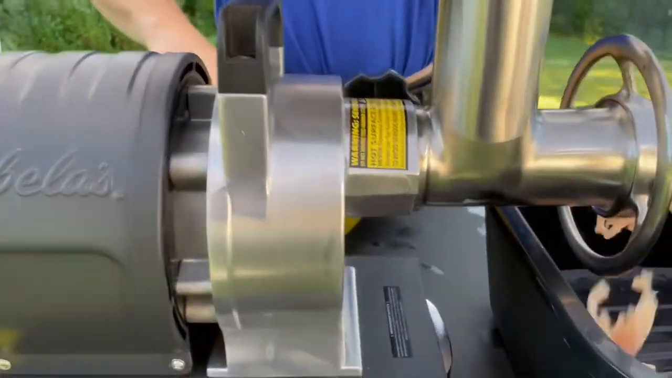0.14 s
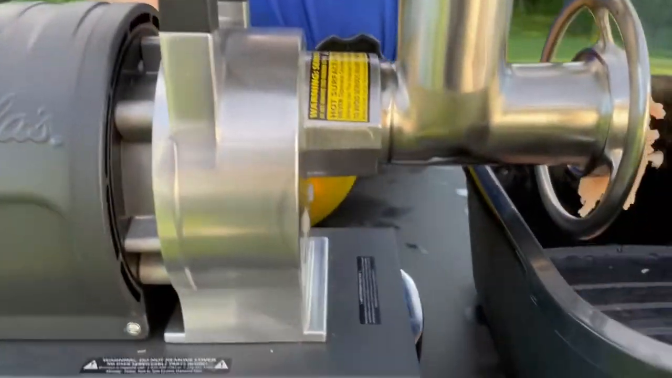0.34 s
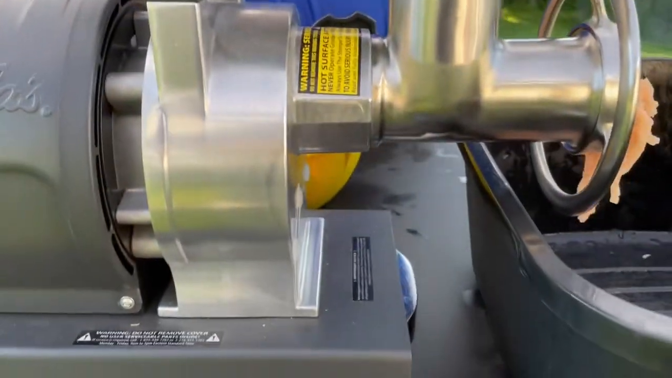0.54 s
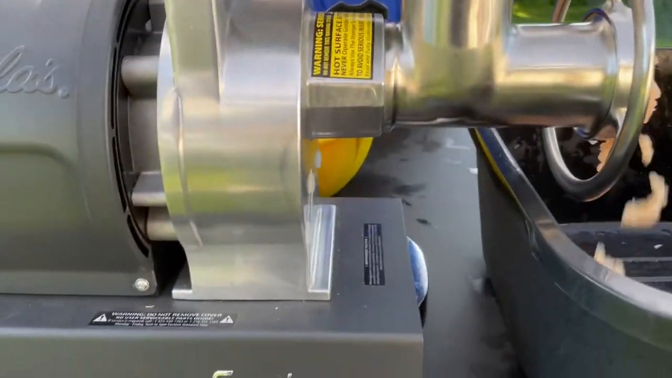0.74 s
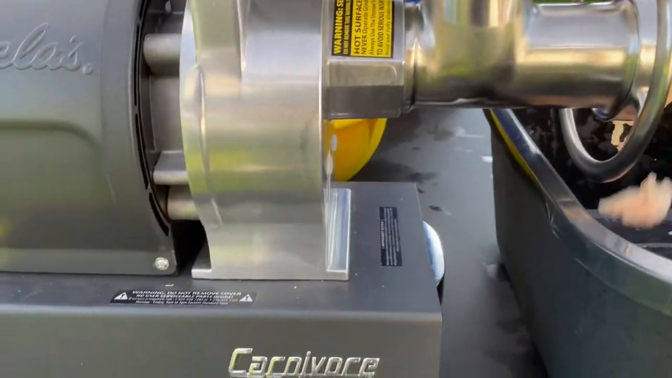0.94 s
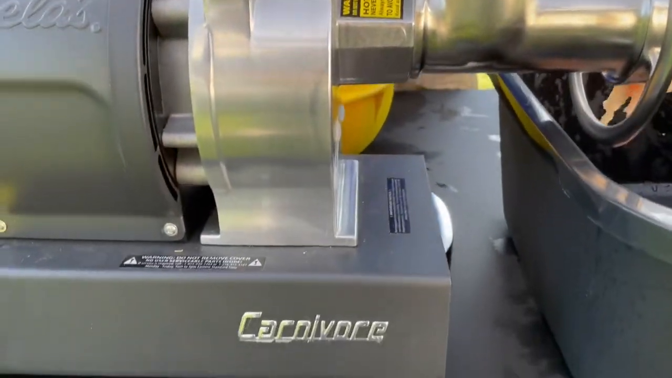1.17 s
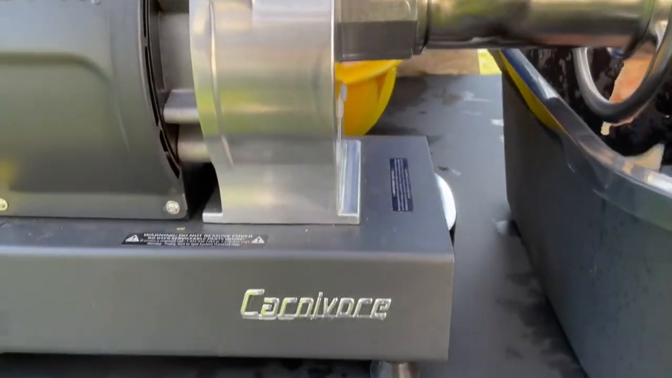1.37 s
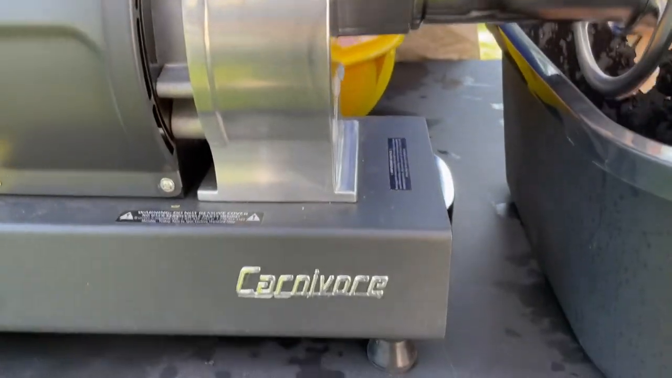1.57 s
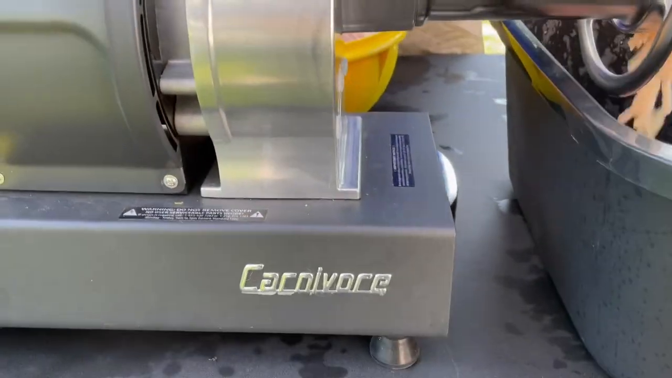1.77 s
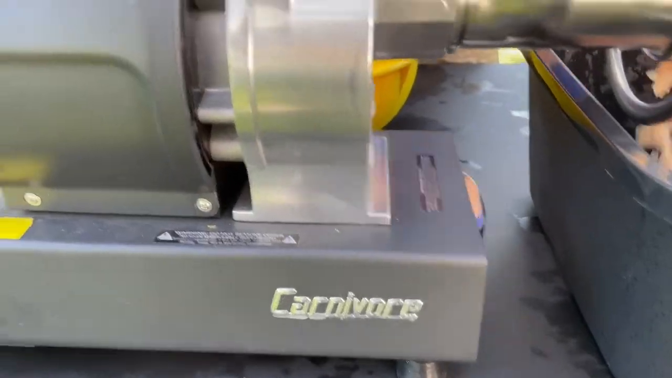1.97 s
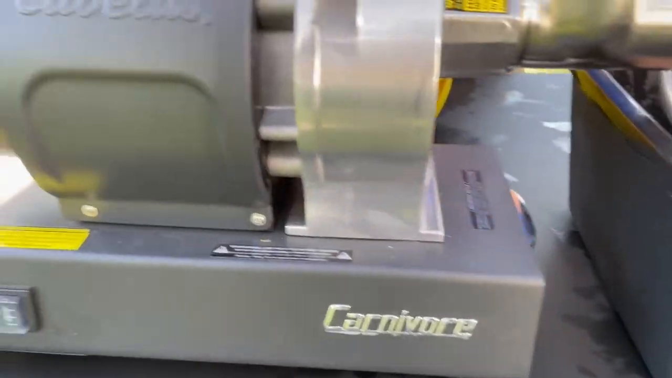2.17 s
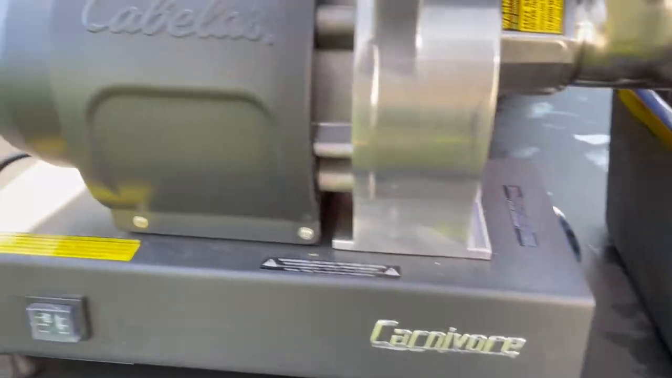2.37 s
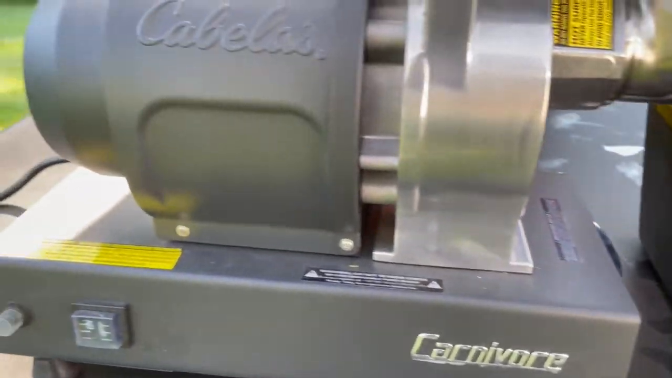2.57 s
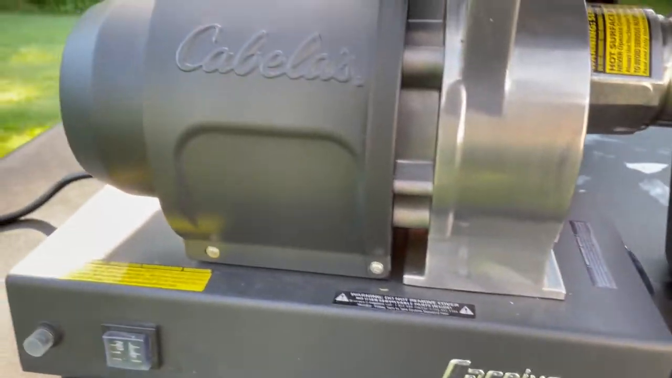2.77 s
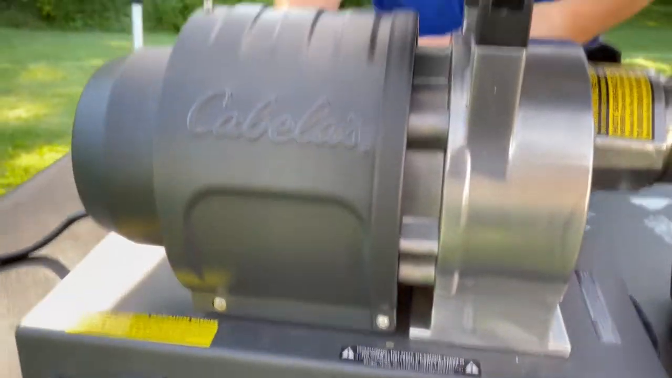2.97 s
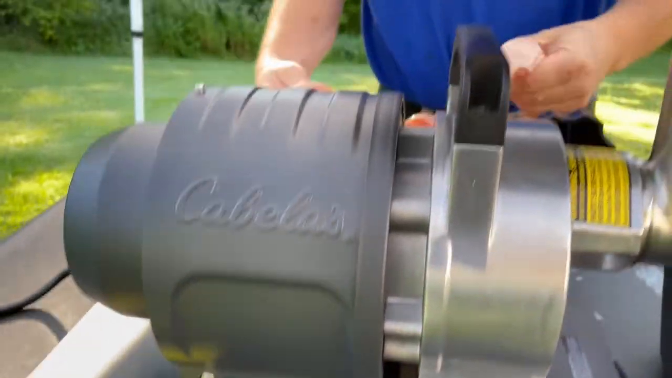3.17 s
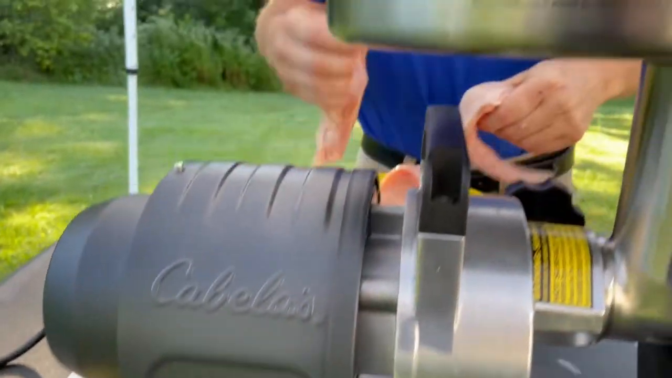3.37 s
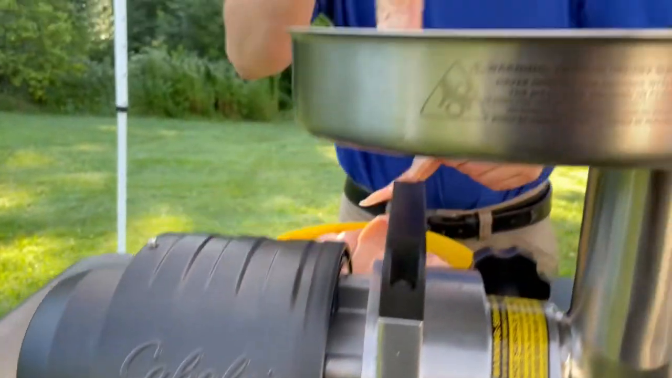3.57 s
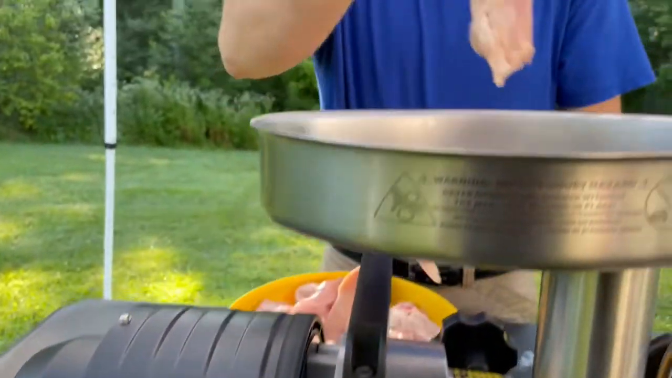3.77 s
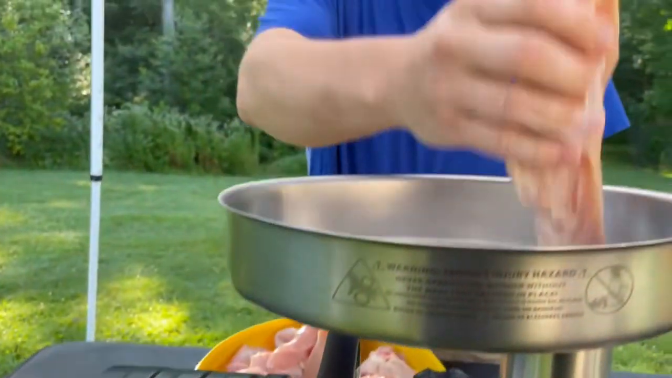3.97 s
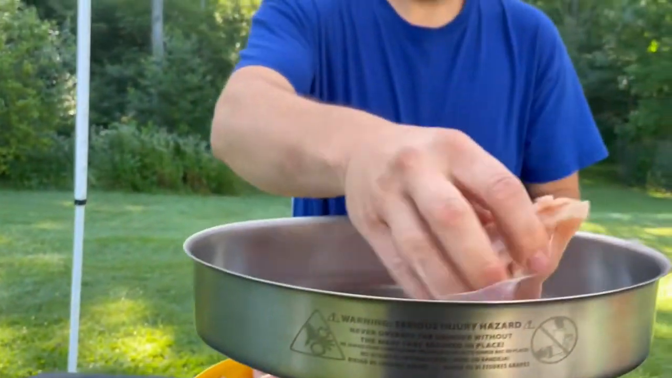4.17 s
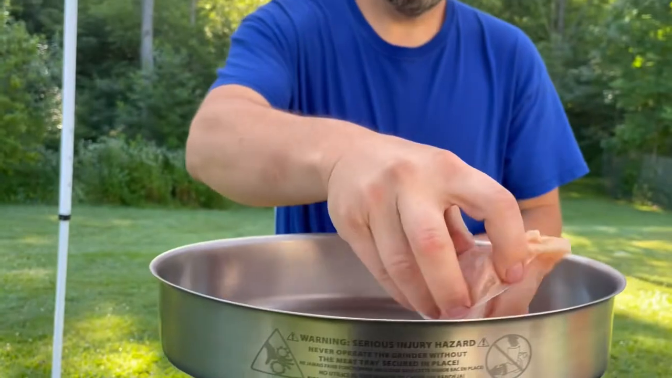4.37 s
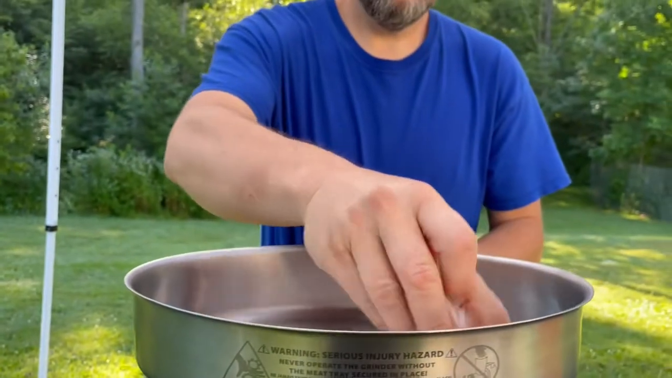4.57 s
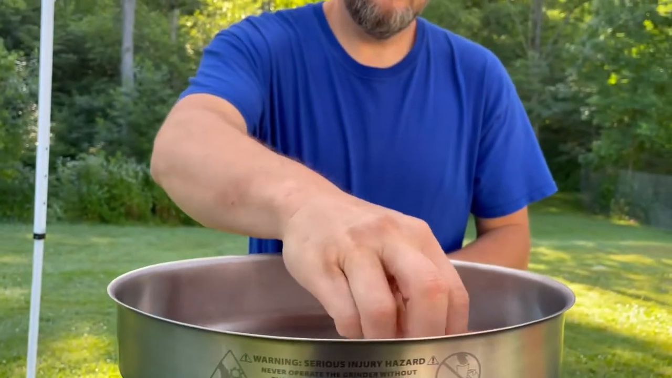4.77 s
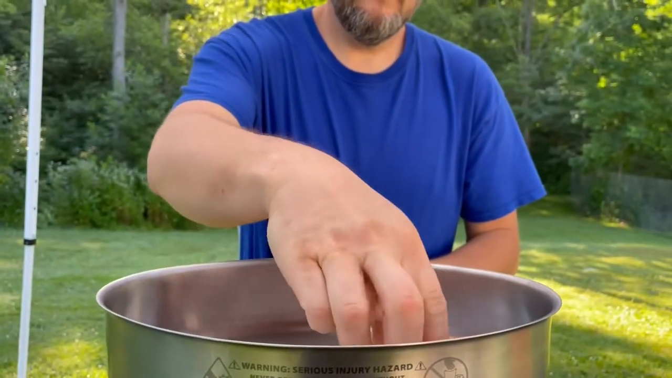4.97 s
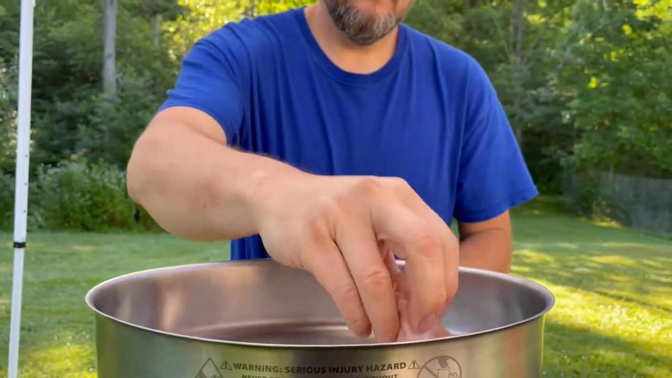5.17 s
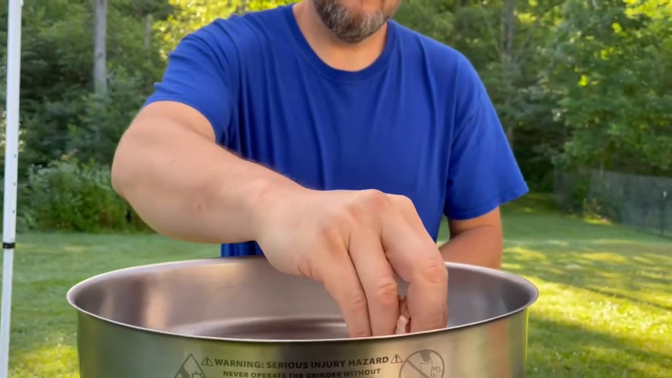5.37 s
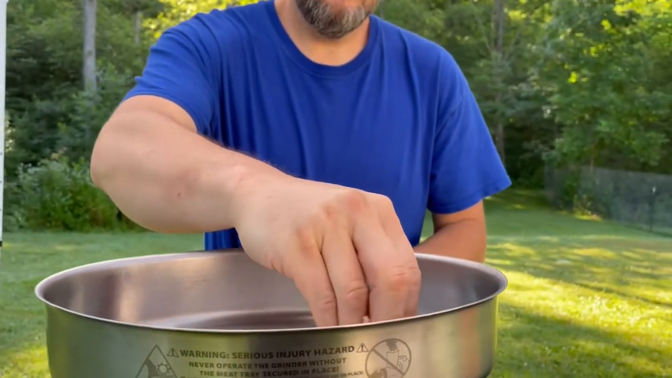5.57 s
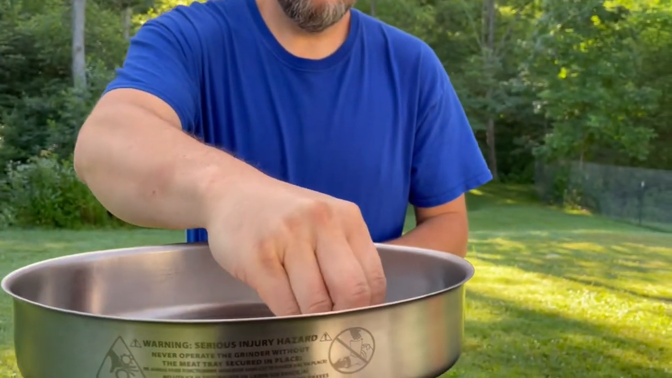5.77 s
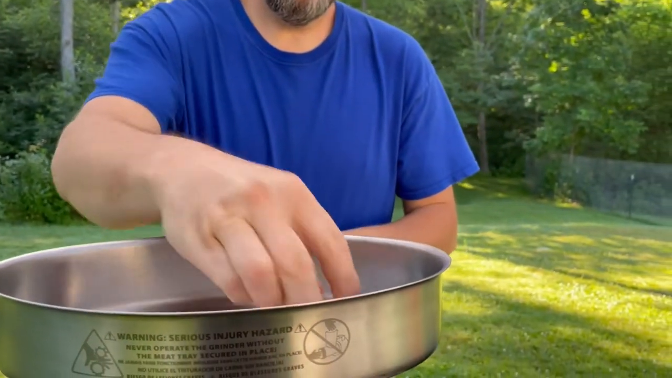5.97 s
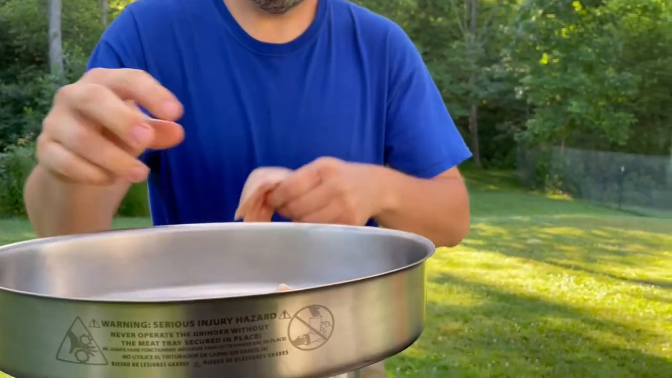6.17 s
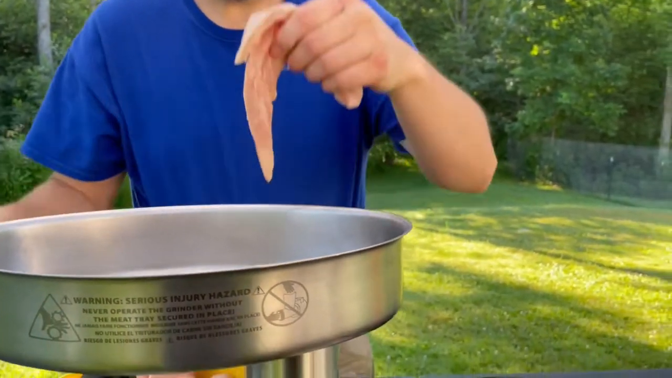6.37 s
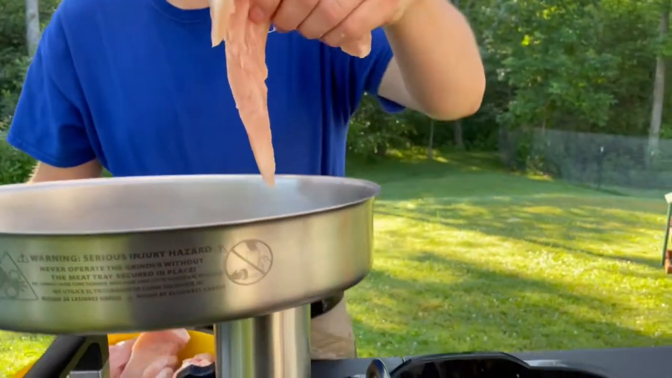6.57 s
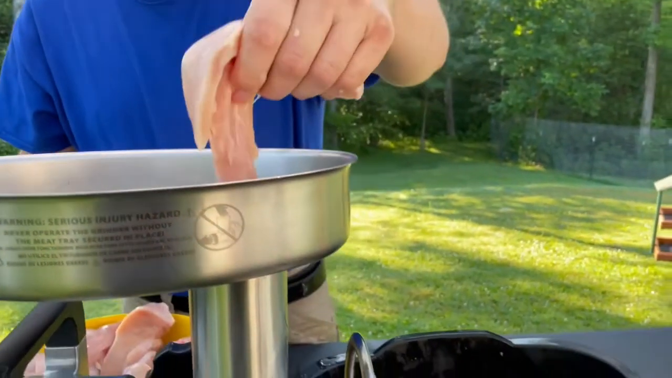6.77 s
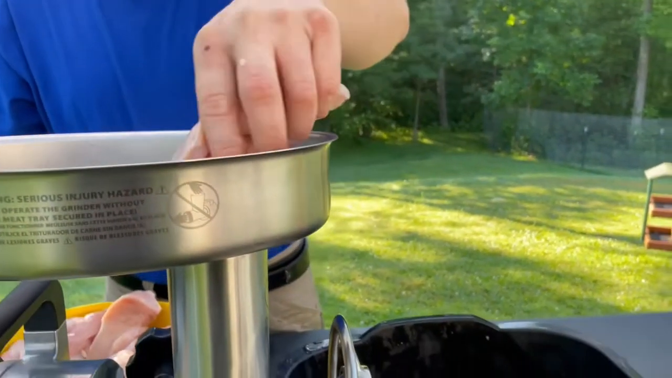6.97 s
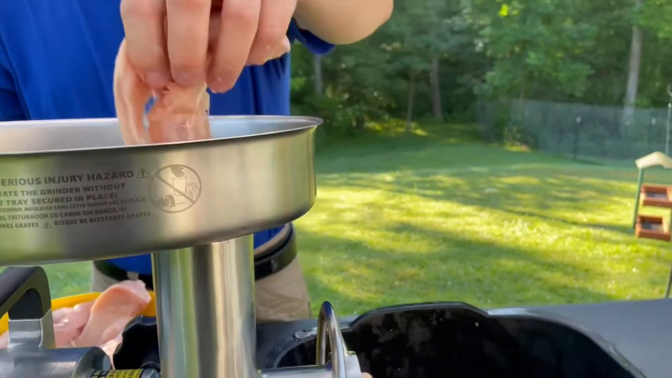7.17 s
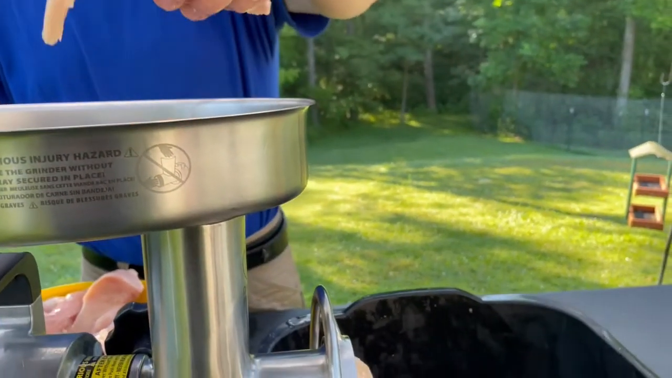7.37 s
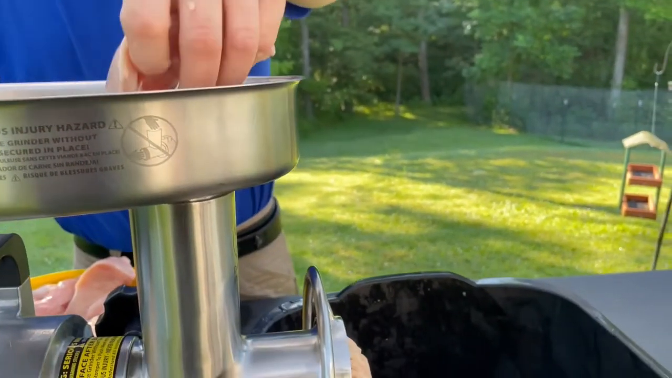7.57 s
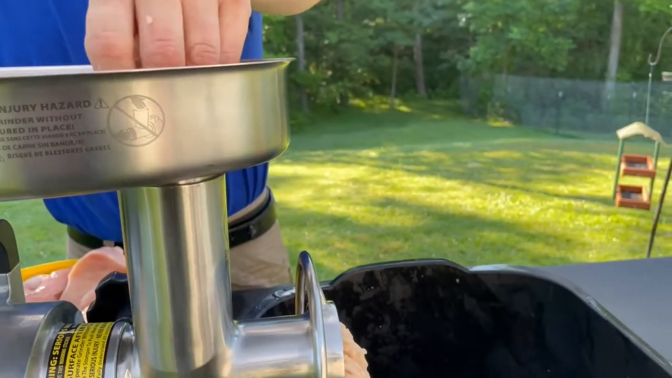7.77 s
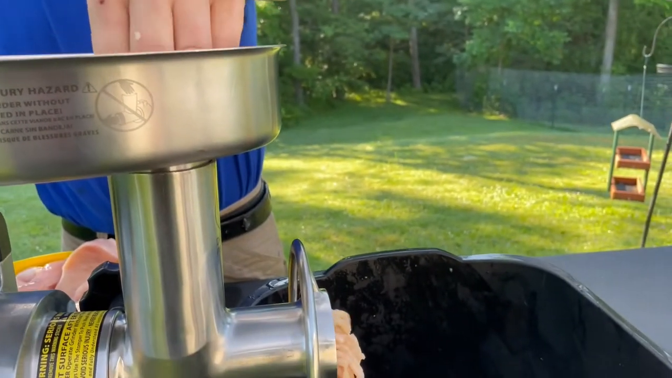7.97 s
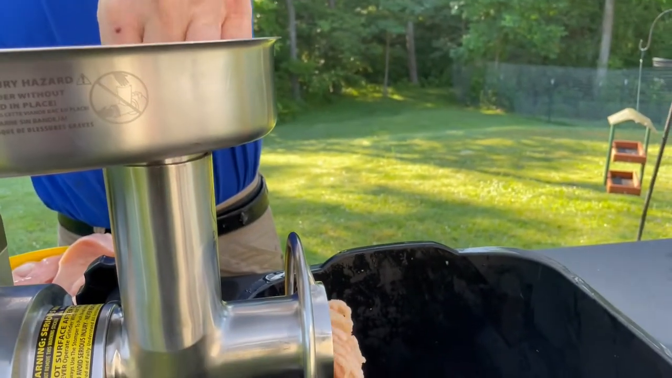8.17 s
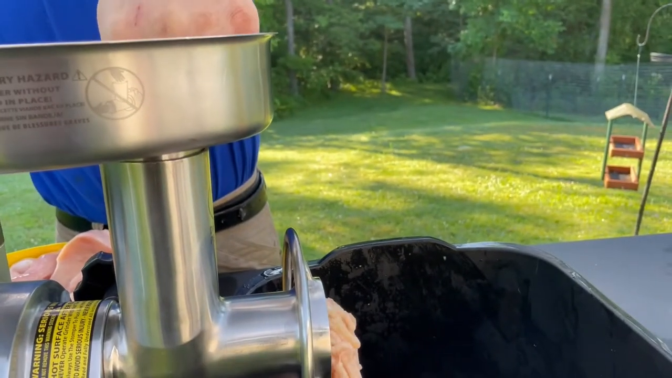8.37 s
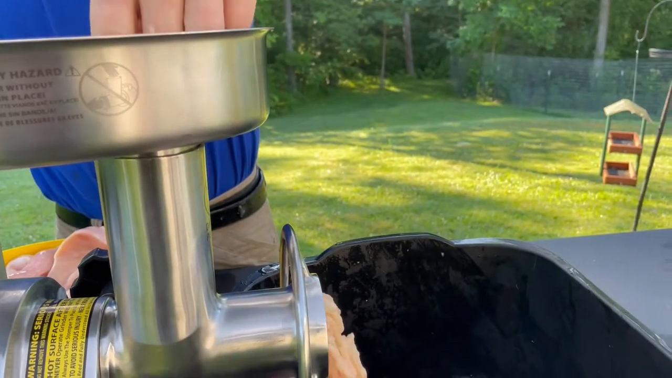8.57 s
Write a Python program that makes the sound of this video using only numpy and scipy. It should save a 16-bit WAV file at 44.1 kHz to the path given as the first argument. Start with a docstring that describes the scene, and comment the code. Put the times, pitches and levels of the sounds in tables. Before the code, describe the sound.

An electric meat grinder runs steadily up close, with a low motor hum, gear whine and faint wet sounds of meat.

```python
"""An electric meat grinder runs on a table outdoors, close to a hand-held two-port microphone.
From the start the motor hums at twice the mains, a 14-tooth pinion whines, the casing rasps, the knife
shears, the fan hisses and the table drones. Within a second come the first bump, snap and gush of meat.
The microphone drifts from the gearbox to the motor (2 s), over the tray (4 s), where bubbles pop, and to
the feed tube (6.5 s) as a load rumbles in the auger. A last push churns just before the end."""
import sys
import numpy as np
from scipy import signal
from scipy.fft import rfft, irfft, next_fast_len
from scipy.io import wavfile
from scipy.ndimage import uniform_filter1d

SR = 44100
rng = np.random.default_rng(int(sys.argv[2]) if len(sys.argv) > 2 else 0)


def bounce(signal):
    """Save signal as a 16-bit WAV file at the path given by the first command-line argument."""
    frames = np.transpose(np.atleast_2d(signal))
    limited = np.clip(frames, -1, 1)
    pcm = np.round(limited * 32767).astype(np.int16)
    wavfile.write(sys.argv[1], SR, pcm)


N = 380583
TIME = np.arange(N) / SR
COARSE = TIME[::4]  # quarter rate: hum and gear tones end below 5 kHz


def gain_of(db):
    return 10 ** (np.asarray(db) / 20)


def unit_rms(x):
    return x / np.sqrt(np.mean(abs(x) ** 2) + 1e-20)


def at_hz(points, hz):
    """A curve read along a log-frequency axis."""
    f, value = np.transpose(points)
    return np.interp(np.log(hz + 1), np.log(f + 1), value)


def peaks_db(modes, hz):
    """Resonances as bell-shaped EQ bands."""
    return sum(db / (1 + (2 * (hz - f) / width) ** 2) for f, width, db in modes)


def follow(rows, t=TIME):
    """Every column of an automation curve at the times t."""
    s, *columns = np.transpose(rows)
    return np.array([np.interp(t, s, c) for c in columns])


def plateau(start, length, rise_s, fall_s):
    """An envelope that reaches 1 at the start, holds for the length and falls to 0."""
    return np.interp(TIME, start + np.cumsum([-rise_s, rise_s, length, fall_s]), [0, 1, 1, 0])


def wander(rate_hz, count):
    """Complex random drifts of rms 1, rolling off above rate_hz."""
    s = np.arange(0, N / SR + .02, .002)
    white = rng.standard_normal((count, len(s), 2)) @ [1, 1j]
    drifts = np.fft.ifft(np.fft.fft(white) / (1 + (np.fft.fftfreq(len(s), s[1]) / rate_hz) ** 2))
    return [np.interp(COARSE, s, row) for row in unit_rms(drifts)]


def add(track, start_s, sound):
    part = track[round(start_s * SR):][:len(sound)]
    part += sound[:len(part)]


def pan_tone(wave, pan_db, lead):
    """A quarter-rate complex tone as full-rate stereo; its magnitude sets the rms."""
    half = gain_of(pan_db / 2) * np.exp(.5j * lead)
    pair = np.array([(wave * half).real, (wave / half).real])
    return np.sqrt(2) * signal.resample_poly(pair, 4, 1, axis=1)[:, :N]


# Left-right balance: (frequency [Hz], left minus right [dB])
STEREO_PAN = [(60, .2), (360, .8), (900, 3), (2200, 6), (4000, 2.5), (6500, 1), (7500, 0)]
# Left-right phase, treble wide near 8 kHz and centred near 11-12 kHz: (frequency [Hz], left lead [rad])
STEREO_PHASE = [(60, 0), (600, .15), (1290, 1.1), (2070, .1), (5000, .4), (6000, -.35), (7000, -1.3),
                (7650, -3.1), (8800, -3.2), (10600, -6.25), (12700, -6.3), (13800, -9.4)]
def left_response(hz):
    """Complex gain of the left channel; the right gets its inverse."""
    return gain_of(at_hz(STEREO_PAN, hz) / 2) * np.exp(.5j * at_hz(STEREO_PHASE, hz))


def spread(mono):
    """Places a mono track in the stereo image."""
    size = next_fast_len(N, True)
    left = left_response(np.fft.rfftfreq(size, 1 / SR))
    return irfft(rfft(mono, size) * [left, 1 / left], size)[:, :N]


# Left-right likeness of the noise beds, almost total in the top treble: (frequency [Hz], likeness [0-1])
BED_LIKENESS = [(60, .995), (300, .96), (700, .85), (1300, .75), (3000, .68), (6000, .85), (7200, .9),
                (7700, .999), (9400, .96), (10900, .999)]
def noise(eq_db, patchy_db, flicker_db, size, patch_frames=6):
    """A stereo noise bed of rms 1: patches of its spectrum drift and its level flickers."""
    hz, t, (common, apart, texture) = signal.stft(rng.standard_normal((3, N)), SR, nperseg=size)
    patches = uniform_filter1d(texture.real, size=6, axis=0)
    patches = unit_rms(uniform_filter1d(patches, size=patch_frames, axis=1))
    flicker = unit_rms(uniform_filter1d(rng.standard_normal(len(t)), size=4))
    alike = np.clip(at_hz(BED_LIKENESS, hz), 0, 1)[:, None]
    left = left_response(hz)[:, None]
    spectra = np.array([common * left, (alike * common + np.sqrt(1 - alike ** 2) * apart) / left])
    spectra *= gain_of(eq_db(hz)[:, None] + patchy_db * patches + flicker_db * flicker)
    return unit_rms(signal.istft(spectra, SR, nperseg=size)[1][:, :N])


# Microphone move: (time [s], position [0 gearbox, 1 motor, 2 tray, 3 feed tube])
MIC_PATH = [(0, 0), (1.9, 0), (2.3, 1), (3.2, 1), (3.9, 2), (6.0, 2), (6.5, 3), (8.63, 3)]
def gain_on_path(levels_db, t=TIME):
    """Fades between four levels as the microphone passes the four positions."""
    return gain_of(np.interp(follow(MIC_PATH, t)[0], range(4), levels_db))


MAINS_HZ = 60
# Body of the hum: (time [s], 120 Hz level [dB], its pan to the left [dB], 240 Hz [dB], 360 Hz [dB])
HUM_LEVELS = [(0.0, -31.7, 0.2, -47.0, -53.0), (1.0, -32.1, 1.1, -48.0, -51.0),
              (1.9, -32.2, 1.0, -48.0, -51.5), (2.5, -32.1, 0.1, -48.2, -54.5),
              (3.2, -33.0, 0.0, -49.3, -54.0), (4.4, -35.4, 0.0, -52.7, -52.5),
              (6.0, -35.5, 0.1, -54.4, -53.5), (7.0, -35.2, 0.9, -56.5, -57.0),
              (8.63, -33.7, 1.6, -57.0, -55.5)]
# Faint overtones: (multiple of the mains, level at gearbox [dB], motor [dB], tray [dB], feed tube [dB])
HUM_OVERTONES = [(5, -61, -61, -67, -70), (8, -59, -63, -62, -67), (9, -78, -64, -69, -75),
                 (10, -60, -59, -64, -65), (12, -71, -75, -64, -68), (16, -62, -62, -60, -63)]
def motor_hum():
    """The iron flexes twice a mains cycle; overtones ride on top, the faint ones wavering."""
    db, pan_db, second_db, third_db = follow(HUM_LEVELS, COARSE)
    cycle = 2 * np.pi * MAINS_HZ * COARSE
    flex = np.exp(2j * cycle)
    out = pan_tone(gain_of(db) * flex, pan_db, lead=0.012)
    out += pan_tone(gain_of(second_db) * flex ** 2, pan_db=2.0, lead=0.27)
    out += pan_tone(gain_of(third_db) * flex ** 3 * np.exp(3.9j), pan_db=0.82, lead=0.22)
    for (k, *levels_db), drift in zip(HUM_OVERTONES, wander(1.6, len(HUM_OVERTONES))):
        level = gain_on_path(levels_db, COARSE) * (1 + 0.33 * drift)
        out += pan_tone(level * np.exp(1j * k * (cycle + 0.648)), pan_db=0.82, lead=0.52)
    return out


# Motor shaft: (time [s], speed [turns/s])
SHAFT_SPEED = [(0, 29.09), (3, 29.07), (6, 29.08), (7.7, 29.12), (8.63, 29.14)]
def shaft_angle(t):
    """Radians the shaft has turned by the times t."""
    return np.interp(t, TIME, 2 * np.pi * np.cumsum(follow(SHAFT_SPEED)[0]) / SR)


PINION_TEETH, WHEEL_TEETH, TURNS_PER_AUGER_TURN = 14, 53, 16.34
# Mesh harmonics along the microphone move: (time [s], 3rd [dB], 4th [dB], 5th [dB])
WHINE_LEVELS = [(0.0, -42.5, -37, -51), (2.0, -43.5, -39.5, -50), (2.4, -41, -36.5, -52),
                (2.95, -44, -39.5, -47.5), (3.1, -46, -41, -45.5), (3.45, -47, -45, -51),
                (3.68, -39.5, -43, -55), (4.4, -41.5, -45.5, -53.5), (5.5, -42, -46, -56),
                (6.0, -43.5, -46.5, -52), (6.2, -47, -44, -53), (6.6, -47.5, -44, -48),
                (7.35, -48.5, -42.5, -47.5), (7.6, -46.5, -48.5, -46.5), (7.9, -46.5, -46, -45.5),
                (8.05, -60, -45, -46.5), (8.21, -44.5, -42, -43.5), (8.63, -52, -41.5, -46)]
# Their stereo image: (time [s], left minus right [dB] for each, left lead [rad] for each)
WHINE_IMAGE = [(0.0, 4.5, 1.0, 8.0, 1.0, 2.4, 0.0), (1.7, 6.5, 7.0, 3.0, 1.1, 2.2, -0.2),
               (2.4, 4.0, 1.5, 6.0, 1.0, 0.8, 0.9), (3.3, -1.0, -0.5, 6.0, 0.6, 0.3, 0.4),
               (4.3, 4.5, 6.0, -1.0, 0.8, 0.6, 4.8), (5.5, 6.0, 12.0, -2.0, 1.1, -0.3, 3.6),
               (6.1, 7.0, 9.0, 3.0, 1.6, -1.3, 3.4), (7.0, 16.0, -2.0, 3.0, 2.0, -2.1, 5.1),
               (8.63, 17.0, -2.5, 5.0, 2.1, -2.2, 5.2)]
# Sidebands of the off-centre pinion, a row per harmonic: (lower [dB], upper [dB])
WHINE_SIDEBANDS = [(-19.5, -11.5), (-9, -14.5), (-19.5, -13.5)]
# Tremolo, a row per harmonic: (auger depth [dB], phase [rad], wheel depth [dB], phase [rad])
WHINE_SWELL = [(0.66, 3.1, 0.93, -1.5), (0.9, 0.1, 0.47, 0.4), (0.9, 4.8, 0.6, 2.9)]
def gear_whine():
    """Meshing teeth sing, swelling with the slower shafts and blurred by uneven tooth load."""
    angle, image = shaft_angle(COARSE), follow(WHINE_IMAGE, COARSE)
    turn = np.exp(1j * angle)
    out = np.zeros((2, N))
    for row, db, slow, fast in zip(range(3), follow(WHINE_LEVELS, COARSE), wander(5.4, 3), wander(32, 3)):
        below, above = gain_of(WHINE_SIDEBANDS[row])
        wobble = 1 + above * turn + below / turn * np.exp(2.2j)  # swells and hurries once a turn
        auger_db, auger_phase, wheel_db, wheel_phase = WHINE_SWELL[row]
        swell_db = auger_db * np.cos(angle / TURNS_PER_AUGER_TURN + auger_phase)
        swell_db += wheel_db * np.cos(angle * PINION_TEETH / WHEEL_TEETH + wheel_phase)
        level = gain_of(db + swell_db) * (wobble + 0.15 * slow + 0.081 * fast)
        tone = np.exp(1j * (row + 3) * PINION_TEETH * angle)
        out += pan_tone(level * tone, pan_db=image[row], lead=image[row + 3])
    return out


# Shaft partials: (multiple of shaft speed, level at gearbox [dB], motor [dB], tray [dB], feed tube [dB])
KNOCK_PARTIALS = [(14, -64, -64, -68, -68), (28, -48, -49, -66, -58), (29, -56, -56, -60, -60),
                  (30, -72, -72, -64, -67), (31, -60, -57, -64, -68), (32, -59, -58, -63, -62),
                  (33, -60, -58, -57, -59), (34, -56, -59, -61, -63), (35, -61, -62, -68, -76),
                  (36, -53, -53, -60, -58), (37, -61, -59, -65, -63), (48, -53, -51, -59, -62),
                  (50, -57, -53, -55, -61), (62, -60, -62, -63, -60), (64, -62, -64, -60, -58),
                  (72, -67, -73, -67, -62), (84, -69, -64, -68, -65), (90, -66, -67, -71, -69),
                  (91, -65, -66, -70, -67), (92, -62, -62, -67, -63), (98, -73, -69, -67, -68),
                  (104, -79, -78, -70, -70), (106, -76, -74, -65, -72), (112, -70, -72, -67, -66),
                  (126, -77, -83, -82, -75), (140, -90, -79, -78, -81), (154, -85, -80, -86, -80)]
def shaft_knock():
    """Loosely aligned harmonics of the shaft add up to a knock each turn."""
    angle, out = shaft_angle(COARSE), np.zeros((2, N))
    scatter = rng.uniform(-1.58, 1, (len(KNOCK_PARTIALS), 2))
    drifts = wander(1.6, len(KNOCK_PARTIALS))
    for (k, *levels_db), drift, (offset, skew) in zip(KNOCK_PARTIALS, drifts, scatter):
        hz = k * SHAFT_SPEED[1][1]
        level = gain_on_path(levels_db, COARSE) * (1 + 0.31 * drift)
        tone = np.exp(1j * k * (angle + 0.041 * offset))
        out += pan_tone(level * tone, at_hz(STEREO_PAN, hz), at_hz(STEREO_PHASE, hz) + skew / 2)
    return out


# Faders of the noise beds: (time [s], casing rasp [dB], fan air [dB], knife shear [dB], drone [dB])
BED_FADERS = [(0, -45.5, -57, -55, -51), (2.2, -45.5, -60, -56, -52.5), (3.4, -46.5, -58, -59, -53),
              (4.2, -49.5, -58.5, -60, -54.5), (6.2, -49, -59.5, -62.5, -56), (6.7, -50, -57, -62, -52.5),
              (8.63, -53, -57, -62.5, -55.5)]
# Tone of the rasp: (frequency [Hz], level [dB])
RASP_EQ = [(400, -25), (650, -19.5), (900, -6.5), (1500, -8), (2000, -6), (2400, -15.5), (3000, -10.5),
           (3600, -24.5), (5000, -33.5)]
# Ringing modes of the housing: (frequency [Hz], width [Hz], gain [dB])
CASING_MODES = [(862, 336, 11), (1175, 130, 5), (1360, 20, 2.5), (1605, 230, 7), (1830, 120, -2),
                (2208, 87, 9.5), (2540, 230, 2.5), (3080, 91, 0.5)]
def casing_rasp():
    """Friction rings through the housing and throbs once a shaft turn."""
    rasp = noise(lambda hz: at_hz(RASP_EQ, hz) + peaks_db(CASING_MODES, hz),
                 patchy_db=1.3, flicker_db=0.95, size=2048, patch_frames=33)
    return rasp * gain_of(follow(BED_FADERS)[0] + 0.67 * np.cos(shaft_angle(TIME)))


# Rings of the steel grinding head: (frequency [Hz], width [Hz], gain [dB])
HEAD_MODES = [(3660, 220, 5), (4100, 200, -4), (4620, 380, 7), (5150, 200, 3), (5900, 600, 6),
              (6850, 350, 4)]
# Wet meat gushing through the knife: (time [s], hold [s], boost [dB])
KNIFE_GUSHES = [(.68, 0.051, 3.5), (1.18, 0.72, 3.5), (2.406, .06, 3), (2.778, .08, 3), (7.497, 0.051, 5.5),
                (7.902, .08, 5), (8.43, 0.05, 5.5)]
# One ring that carries unevenly: (gain at gearbox [dB], motor [dB], tray [dB], feed tube [dB])
RING_SEND = [-21, -1.5, -13, -4]
RING_HZ, RING_WIDTH_HZ = 4480, 240
def knife_shear():
    """The knife shears meat: a wet hiss, coloured by the steel head, that swells in gushes."""
    eq = [(2500, -45), (3500, -2.0), (5500, -2.5), (7000, -3.0), (12000, -12.5), (15000, -30)]
    gush_db = sum(db * plateau(s, hold, rise_s=0.035, fall_s=.08) for s, hold, db in KNIFE_GUSHES)
    shear = noise(lambda hz: at_hz(eq, hz) + peaks_db(HEAD_MODES, hz),
                  patchy_db=4.0, flicker_db=0.94, size=1024, patch_frames=20)
    shear *= gain_of(follow(BED_FADERS)[2] + gush_db)
    ring = signal.lfilter(*signal.iirpeak(RING_HZ, RING_HZ / RING_WIDTH_HZ, SR), shear)
    return shear + ring * gain_on_path(RING_SEND)


# Tone of the cooling air: (frequency [Hz], level [dB])
FAN_EQ = [(1500, -39), (2500, -3), (3500, -0.5), (5000, -5), (7000, -6.5), (8000, -3), (9500, -6),
          (11000, -10.5), (12000, -15), (13500, -22.5), (15000, -11.5)]
def fan_air():
    """Bright air from the cooling fan buzzes with the magnet pull."""
    pull = 2 * np.pi * 2 * MAINS_HZ * TIME
    buzz_db = 1.7 * np.cos(pull) + 2.15 * np.cos(2 * pull)
    air = noise(lambda hz: at_hz(FAN_EQ, hz) + 0.077 * peaks_db(HEAD_MODES, hz),
                patchy_db=3.0, flicker_db=1.45, size=1024, patch_frames=65)
    return air * gain_of(follow(BED_FADERS)[1] + buzz_db)


# Tone of the table: (frequency [Hz], level [dB])
DRONE_EQ = [(25, -41), (50, -29), (72, 7), (95, -3.5), (160, -0.5), (210, -10), (310, 1), (450, -4),
            (650, -7), (1000, -7.5), (2000, -66)]
def table_drone():
    """The table drones under the machine: the low bed of the mix."""
    drone = noise(lambda hz: at_hz(DRONE_EQ, hz), patchy_db=0, flicker_db=0, size=2048)
    return drone * gain_of(follow(BED_FADERS)[3])


HIT_TIME = np.arange(4096) / SR  # time axis of one bump, snap or pop
# Bump cues: (time [s], peak level [dB])
BUMP_CUES = [(.397, -50), (3.92, -49), (3.97, -50), (4.062, -52), (4.172, -53), (4.486, -51), (7.019, -56)]
def table_bumps(pitch_hz=72, rise_s=0.019):
    """Dull bumps come through the table, each a few slow cycles."""
    out, t = np.zeros(N), HIT_TIME
    bump = np.sin(2 * np.pi * pitch_hz * t) * (t / rise_s) * np.exp(1 - t / rise_s)
    for s, db in BUMP_CUES:
        add(out, s, gain_of(db) * bump)
    return spread(out)


# Snap cues: (time [s], level [dB], centre [Hz], width [Hz])
SNAP_CUES = [(.530, -41.5, 7500, 12000), (3.225, -57, 11000, 5000), (4.665, -50, 11000, 4000),
             (5.084, -49, 4630, 500), (5.196, -45, 3840, 700), (5.79, -55, 12000, 5000),
             (6.520, -43, 5070, 3500), (6.580, -50, 6800, 900), (7.262, -49, 11500, 5000)]
def gristle_snaps(attack_s=.0004, t60_s=0.035):
    """Wet meat and gristle snap in tight bursts of band-passed noise."""
    out, t = np.zeros(N), HIT_TIME
    hz = np.fft.rfftfreq(len(t), 1 / SR)
    for s, db, centre_hz, width_hz in SNAP_CUES:
        band = np.exp(-2 * ((hz - centre_hz) / width_hz) ** 2)
        burst = unit_rms(irfft(rfft(rng.standard_normal(len(t))) * band))
        add(out, s, gain_of(db - 60 * t / t60_s) * np.minimum(t / attack_s, 1) * burst)
    return spread(out)


# Pop cues: (time [s], base level [dB], starting pitch [Hz])
POP_CUES = [(3.395, -54, 2380), (5.052, -48, 2250), (5.288, -54, 2300), (6.758, -50, 3090)]
def bubble_pops():
    """Bubbles pop in the mince as soft, slightly rising blips."""
    out, t = np.zeros(N), HIT_TIME
    envelope = (t / 0.0023) * np.exp(1 - t / 0.0039)
    for s, db, pitch_hz in POP_CUES:
        add(out, s, gain_of(db) * envelope * np.sin(2 * np.pi * pitch_hz * (t + 1.3 * t ** 2)))
    return spread(out)


# Tone of the rumble: (frequency [Hz], level [dB])
RUMBLE_EQ = [(80, -30), (150, -2), (200, -6), (280, 0), (370, -5), (460, -16), (900, -50)]
# Rings of the loaded barrel: (frequency [Hz], width [Hz], gain [dB])
BARREL_MODES = [(158, 26, 10), (207, 14, 8.5), (275, 20, 9), (317, 24, 11), (410, 24, 8)]
# Loads of meat: (time [s], hold [s], level [dB])
LOAD_CUES = [(6.093, 1.55, -50.5), (8.2, .08, -56), (8.455, .2, -54)]
def auger_rumble(idle_db=-65):
    """The barrel rumbles faintly throughout and swells while meat is fed to the auger."""
    rumble = noise(lambda hz: at_hz(RUMBLE_EQ, hz) + peaks_db(BARREL_MODES, hz),
                   patchy_db=1.0, flicker_db=0, size=4096)
    load = sum(gain_of(db) * plateau(s, hold, rise_s=0.066, fall_s=0.15) for s, hold, db in LOAD_CUES)
    return rumble * (gain_of(idle_db) + load)


def meat_churn(start_s=8.43, rise_s=0.16, level_db=-47.5, centre_hz=490):
    """The last push of meat fades in a narrow, restless churn above the rumble."""
    churn = noise(lambda hz: -np.minimum(((hz - centre_hz) / 28) ** 2, 80),
                  patchy_db=3.5, flicker_db=3.0, size=1024)
    return churn * gain_of(level_db) * np.clip((TIME - start_s) / rise_s, 0, 1)


# Brief dips of the whole mix: (time [s], gain [dB])
MIX_DIPS = [(7.668, -2.5), (8.258, -3)]
def scene():
    """Machine and meat together; the level dips twice near the end."""
    machine = motor_hum() + gear_whine() + shaft_knock() + casing_rasp() + fan_air()
    machine += knife_shear() + table_drone()
    meat = auger_rumble() + meat_churn() + table_bumps() + gristle_snaps() + bubble_pops()
    dip_db = sum(db * np.exp(-((TIME - s) / 0.0047) ** 2) for s, db in MIX_DIPS)
    return (machine + meat) * gain_of(dip_db)


def record(dry):
    """A steep low-pass takes off the top air."""
    lowpass = signal.firwin(511, cutoff=15300, window=("kaiser", 9), fs=SR)
    return signal.oaconvolve(dry, lowpass[None], "same")


dry = scene()
out = record(dry)
bounce(out)
```